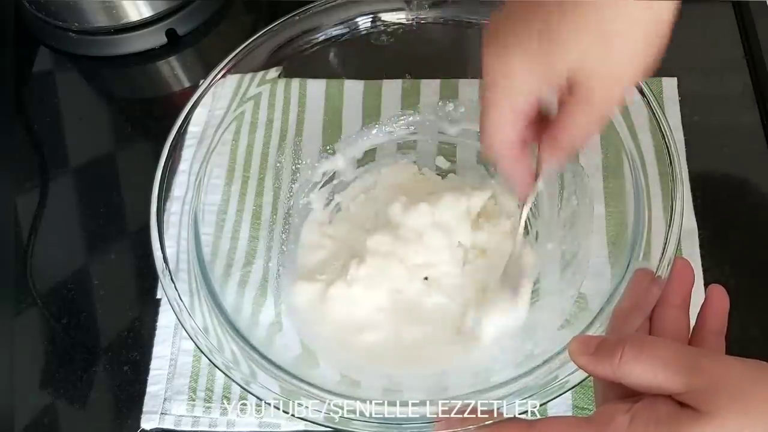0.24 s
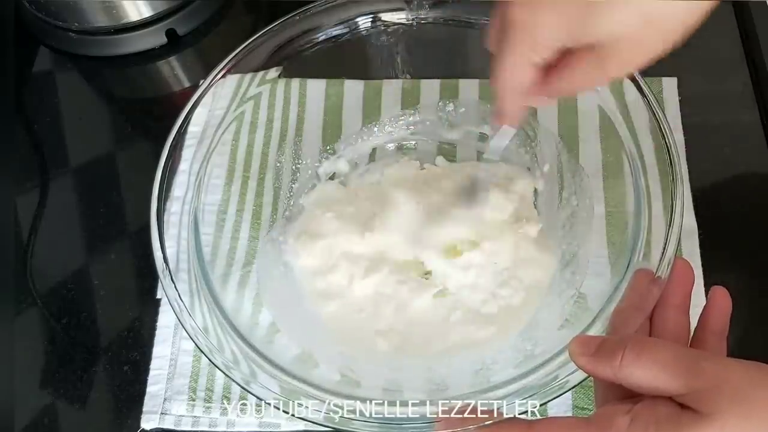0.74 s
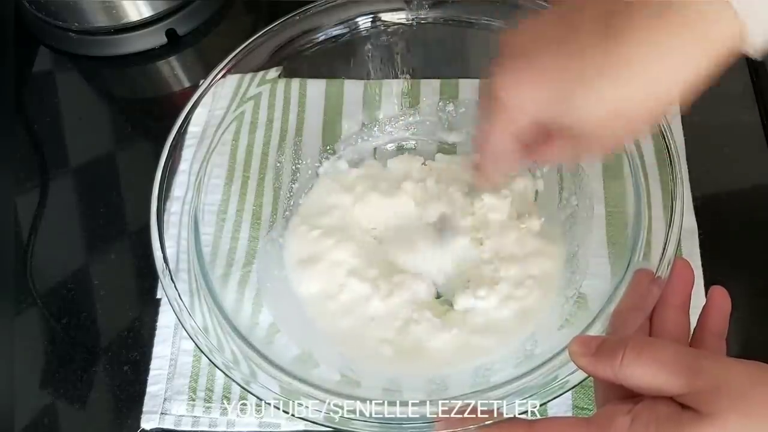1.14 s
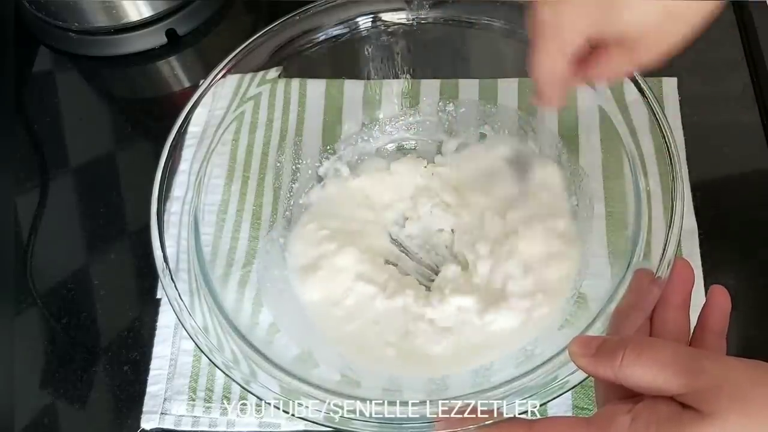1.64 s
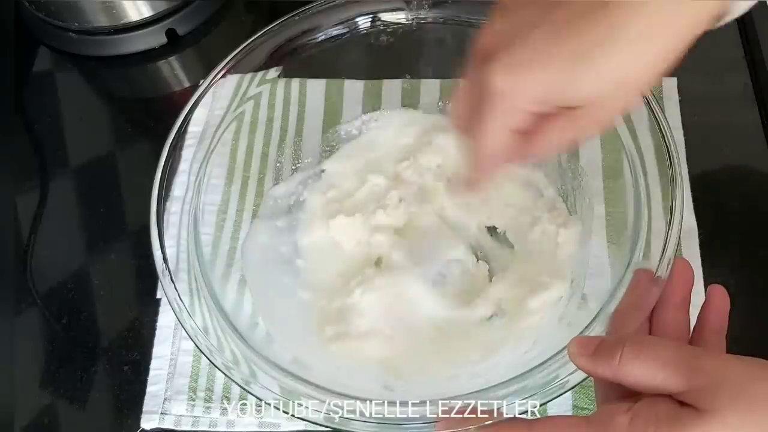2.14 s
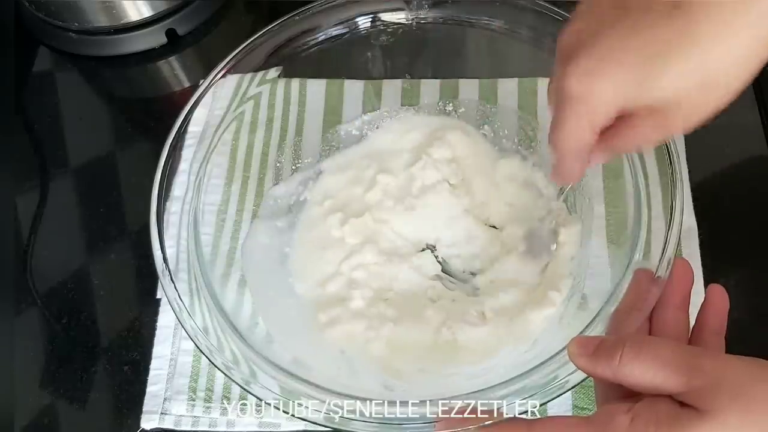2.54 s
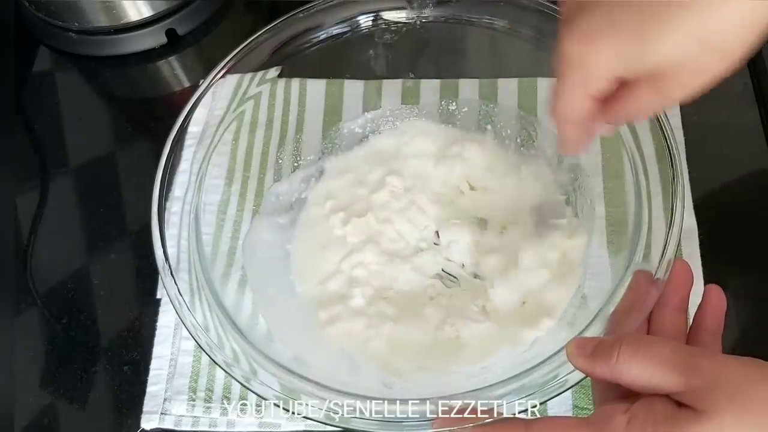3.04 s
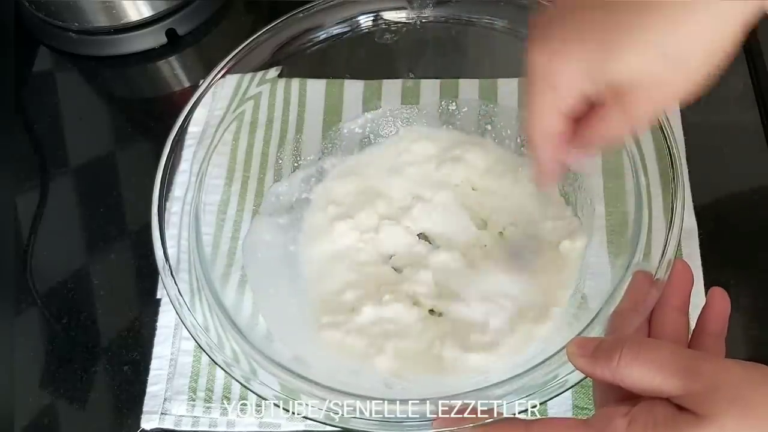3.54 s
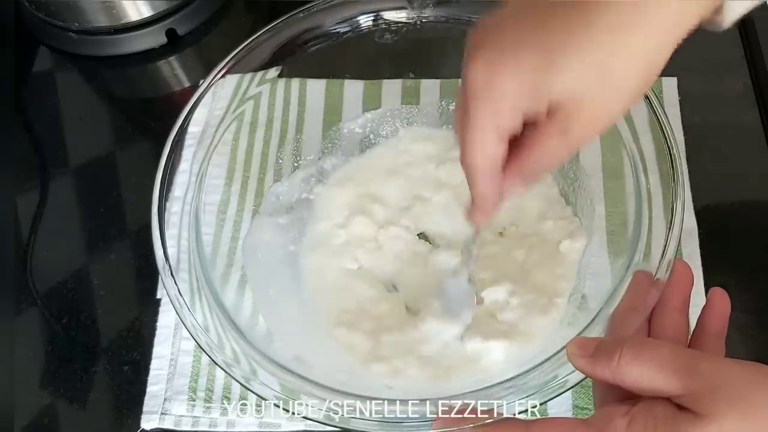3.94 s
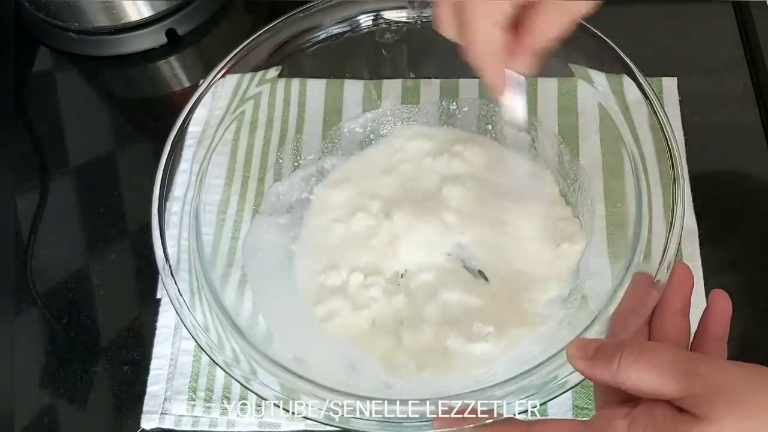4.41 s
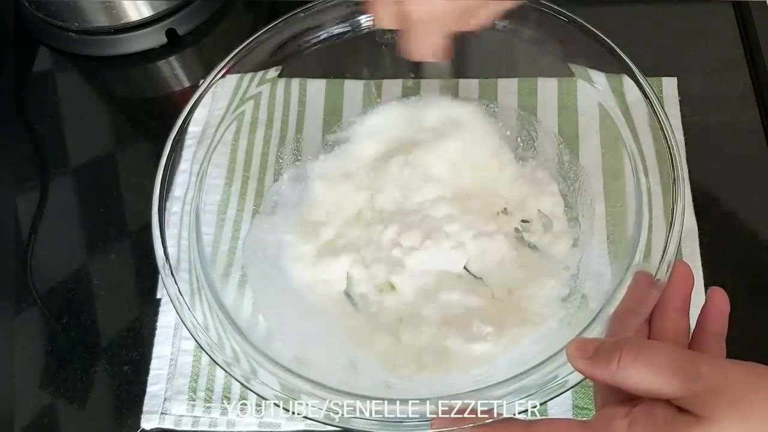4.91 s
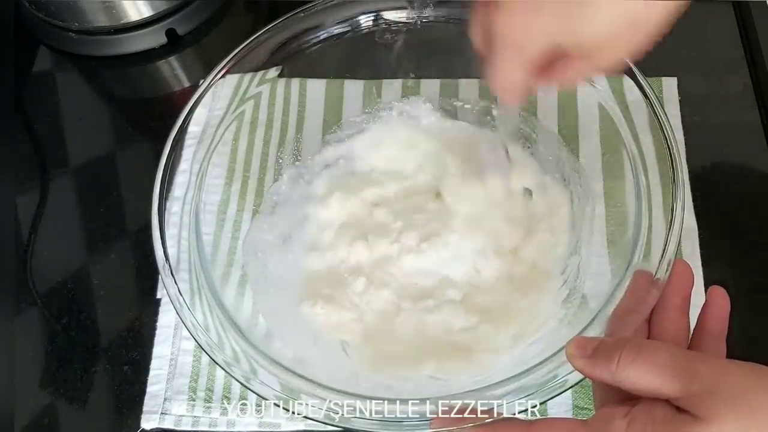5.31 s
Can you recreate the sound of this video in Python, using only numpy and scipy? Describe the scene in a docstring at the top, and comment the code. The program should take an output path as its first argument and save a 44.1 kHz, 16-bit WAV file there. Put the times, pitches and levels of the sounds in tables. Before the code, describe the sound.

Close wet squelching and crackling of creamy food stirred with a metal fork, glass clinking now and then over faint hiss.

```python
"""Wet smacks and crackle, close by, with a clink of glass: a fork mashes soft curds in a thick glass bowl
that stands on a cloth on a kitchen counter. Plunges and drags of the fork shape noise made of tearing grains;
bursting pockets are ringing puffs of noise, scrapes are resonant noise and clinks are decaying glass modes.
Under them the shoved counter hums low in noise-fed resonances. A small hard room answers by convolution;
two microphones a hand apart, with a steady hiss."""
import sys
import numpy as np
from scipy import signal
from scipy.fft import rfft, irfft
from scipy.io import wavfile

SR = 44100
rng = np.random.default_rng(int(sys.argv[2]) if len(sys.argv) > 2 else 0)


def to_wav(s):
    """Save 16-bit WAV."""
    ch = np.atleast_2d(s).T  # columns
    pcm = np.round(np.clip(ch, -1, 1) * 32767)  # PCM
    wavfile.write(sys.argv[1], SR, pcm.astype(np.int16))


N = 245360  # length [samples]
LIFT_S = 0.032  # time for a drag, scrape or glassy ring to fade by 20 dB after its peak [s]

# All source levels below are set ahead of the room and of the balance between the microphones.


def mash():
    """Tiny films tear by the hundred each second, some wide, some pitched; the squelch is lower in pitch."""
    # the fork plunges in, the crackle bites at once and settles:
    # (time [s], crackle level [dB], fade per 20 dB [s], squelch relative to crackle [dB])
    plunges = [(0.009, -64, 0.14, 13.5), (0.218, -73.5, 0.31, 11), (0.389, -62.5, 0.12, 7.5),
               (0.457, -60, 0.086, -20), (0.704, -74.5, 1, 8), (0.959, -52.5, 0.16, 6),
               (1.229, -55.5, 0.27, -1.5), (1.752, -53, 0.12, 5), (1.878, -56.5, 0.88, -3),
               (1.98, -37, 0.063, 6.5), (2.393, -45.5, 0.073, -2.5), (2.591, -55.5, 0.047, -63),
               (3.237, -56, 0.25, -3), (3.544, -62.5, 0.18, -13), (4.057, -47, 0.13, -3),
               (4.282, -60, 0.14, 25), (4.563, -50.5, 0.074, 20), (4.869, -67, 0.15, -42),
               (5.451, -50.5, 0.08, 3.5)]
    # the fork drags through, the crackle swells until the tines lift:
    # (lift time [s], crackle level [dB], swell per 20 dB [s], squelch relative to crackle [dB])
    drags = [(0.931, -64.5, 0.26, 9.5), (1.321, -61.5, 0.091, 17), (1.567, -58.5, 0.12, 1.5),
             (2.268, -46, 0.028, -23), (2.651, -54, 0.022, -6.5), (2.873, -63, 0.12, 11.5),
             (3.077, -70, 0.16, 19), (3.151, -67.5, 0.096, 6), (3.34, -52, 0.13, -34),
             (3.604, -53.5, 0.049, -26), (3.861, -61.5, 0.11, -23), (4.2, -66, 0.076, 9.5),
             (4.977, -56, 0.032, -6.5), (5.095, -61.5, 0.25, -22), (5.272, -52.5, 0.16, 7.5)]
    # spectra of the fine tearing and of the deep squelch: (frequency [Hz], relative level [dB])
    crackle_spectrum = [(1200, -107), (2300, 17), (3300, -26.5), (4500, -10), (8000, 3), (12000, 17.5),
                        (16000, 5)]
    squelch_spectrum = [(120, -16.5), (300, 12), (700, 5), (1300, -10), (2200, -131.5), (4000, -5)]
    bite_s = 0.0075  # swell of a plunge per 20 dB [s]
    rest_crackle_db, rest_squelch_db = -90, -77  # the mash settling between strokes

    strokes = [(s, db, bite_s, fade, deep) for s, db, fade, deep in plunges]
    strokes += [(s, db, swell, LIFT_S, deep) for s, db, swell, deep in drags]
    crackling = efforts(rest_crackle_db, [row[:4] for row in strokes])
    deep_strokes = [(s, db + deep, swell, fade) for s, db, swell, fade, deep in strokes]
    squelching = efforts(rest_squelch_db, deep_strokes)

    noise = rng.standard_normal((3, N))
    noise = noise[0] + noise[1:]  # partly alike at the two sides
    pitched = 0
    for hz in np.geomspace(1500, 9000, num=5):
        grains = noise * tearing(per_s=200, spread_db=9.5, grain_s=0.006)
        pitched = pitched + evened(resonate(grains, hz, width=0.5 * hz))
    wide = coloured(noise * tearing(per_s=450, spread_db=6, grain_s=0.003), crackle_spectrum)
    sharp_pops = coloured(noise * tearing(per_s=160, spread_db=6.5, grain_s=0.0008), crackle_spectrum)
    crackle = wide + 0.9 * pitched + 0.55 * sharp_pops
    squelch = coloured(noise * tearing(per_s=200, spread_db=8.2, grain_s=0.0037), squelch_spectrum)
    return crackling * crackle + squelching * squelch


def tearing(per_s, spread_db, grain_s):
    """Level of many short decaying grains, few of them large, over a thin steady fizz."""
    sizes = gain_of(spread_db * np.minimum(rng.exponential(1, N), 3))
    tears = sizes * (rng.random(N) < per_s / SR)
    decay = np.exp(-1 / (grain_s * SR))
    grains = signal.lfilter([1], [1, -decay], tears) / (grain_s * SR)
    return evened(0.25 * tears.mean() + grains)


def smacking():
    """Pockets in the mash burst wetly, one by one, as the fork works."""
    # wet smacks and ticks of the tines:
    # (time [s], pocket peak level before a small random tilt [dB], pocket pitch [Hz],
    #  peak of the treble snap relative to the pocket [dB])
    smacks = [(0.011,-35,2240,1),(0.156,-48.5,710,10.5),(0.218,-39,8750,-9),(0.385,-29,9300,5),(0.456,-38.5,2170,16.5),(0.698,-46,1940,-16),(0.716,-42.5,4100,-22),(0.793,-43,4070,8),(0.811,-41.5,1260,-10),(0.848,-35,4330,4),(0.952,-29.5,2570,5),(1.04,-44,6960,17),(1.059,-32.5,5500,5.5),(1.093,-38,3880,0),(1.108,-38.5,8950,7),(1.132,-48,2600,21),(1.23,-39,1070,5),(1.266,-30.5,4100,4),(1.304,-26.5,2680,-24),(1.314,-27,2350,1.5),(1.371,-33,2330,2.5),(1.51,-35.5,2300,-3),(1.541,-31,5400,-5),(1.577,-39.5,7050,13),(1.618,-32.5,3900,5.5),(1.651,-39,3800,9),(1.659,-37,3050,15.5),(1.735,-43.5,1120,8.5),(1.752,-31,1540,12),(1.857,-37.5,7700,7),(1.868,-32.5,2830,9.5),(1.98,-20.5,1620,-9),(2.004,-22.5,1060,-17),(2.207,-25.5,2720,8.5),(2.27,-29,997,2),(2.398,-26,4600,0),(2.403,-22,2260,-19),(2.453,-24,4400,-5),(2.587,-35,7000,11.5),(2.633,-32,2670,-6),(2.663,-37,9000,14.5),(2.855,-25.5,8540,-3),(2.873,-26.5,8400,2),(3.062,-40.5,5540,4),(3.131,-32.5,7300,9),(3.237,-35,2700,-16),(3.273,-37,1180,13.5),(3.54,-35.5,7960,16),(3.798,-39,4300,10.5),(3.833,-34,2740,6.5),(4.051,-30,1870,-17),(4.064,-16,8450,5),(4.2,-33.5,8860,7.5),(4.284,-14,7000,-4),(4.427,-37,7860,12),(4.556,-10.5,7200,-16),(4.72,-43,2500,16),(4.863,-30.5,5740,-4),(4.94,-37.5,7340,2),(5.012,-38,2270,-3),(5.098,-35.5,1460,-13),(5.112,-32.5,2030,4.5),(5.216,-41,3870,-17),(5.24,-36.5,2230,-15),(5.254,-29,1140,-19),(5.446,-29.5,8600,10),(5.476,-26,680,-8)]
    food = np.zeros((2, N))
    for s, *row in smacks:
        add(food, s, smack(*row))
    return food


def smack(db, hz, snap_db):
    """A pocket in the mash bursts: a puff of noise rings its pitch and a shorter snap of treble tops it."""
    t = np.arange(3000) / SR
    noise = rng.standard_normal((4, 3000)) * (1 - np.exp(-t / 0.0001))
    puff = noise[0] * np.exp(-t / (0.003 + 1.8 / hz))  # deep pockets empty slower
    pocket = resonate(puff, hz, width=0.22 * hz)
    hiss_burst = (noise[1] + noise[2:]) * np.exp(-t / 0.002)  # partly alike at the two sides
    snap = signal.lfilter(*signal.butter(2, 5000, "high", fs=SR), hiss_burst)
    both = pocket / abs(pocket).max() + gain_of(snap_db) * snap / abs(snap).max()
    tilt_db = rng.normal(0, 1.2) * np.array([[1], [-1]])  # left against right
    return gain_of(db + tilt_db) * both


def scraping():
    """Grainy noise rings one narrow pitch per scrape or glassy ring, with a high sizzle on top."""
    # resonant scrapes, and two short glassy rings near 2 kHz at 0.022 and 0.462 s:
    # (peak time [s], level of the pitched part [dB], swell per 20 dB [s], pitch [Hz])
    scrapes = [(0.022, -52.5, 0.0059, 2200), (0.462, -46.5, 0.0062, 2000), (1.325, -69, 0.059, 2440),
               (3.606, -48, 0.051, 2760), (3.855, -51, 0.06, 2700), (5.03, -48.5, 0.089, 2180),
               (5.13, -44, 0.053, 1700)]
    pitch_width = 0.18  # share of the pitch
    sizzle_hz, sizzle_width_hz, sizzle_db = 11500, 1500, -4  # level relative to the pitched part

    noise = rng.standard_normal((3, N))
    grains = (noise[0] + noise[1:]) * tearing(per_s=450, spread_db=2.5, grain_s=0.0033)
    sizzle = gain_of(sizzle_db) * evened(resonate(grains, sizzle_hz, sizzle_width_hz))
    out = np.zeros((2, N))
    for s, db, swell, hz in scrapes:
        pitched = evened(resonate(grains, hz, pitch_width * hz))
        out += efforts(-np.inf, [(s, db, swell, LIFT_S)]) * (pitched + sizzle)
    return out


def clinking():
    """The fork strikes the glass; where it lands sets which modes answer."""
    # (time [s], rim level [dB], wall level [dB], tine level [dB], thump level [dB],
    #  free ring before the mash muffles it [s])
    clinks = [(0.016, -45, -64, -74, -60, .08), (0.456, -60, -72, -56, -34, .1),
              (1.995, -41, -70, -60, -27, .05), (2.103, -60, -31, -56, -50, .085),
              (2.883, -80, -54, -80, -46, .03), (3.024, -43, -66, -62, -44, .035),
              (4.065, -38, -54, -37, -36, .22), (4.284, -29, -35, -22, -30, .15),
              (4.556, -27, -46, -26, -28, .15), (5.478, -60, -56, -60, -48, .08)]
    glass = np.zeros((2, N))
    for s, *row in clinks:
        add(glass, s, clink(*row))
    return glass


def clink(*row):
    """Each mode blooms over some cycles and dies, fast once the mash presses; chattering tines blur the rings."""
    # modes in four families, rim, wall, tine and thump:
    # (frequency [Hz], level relative to the family [dB], t60 while free [s])
    bowl_modes = [
        [(511, 4, 0.5), (526, 1, 0.25)],
        [(1335, 14, 0.05), (1349, -2, 0.33), (1435, -8, 0.3)],
        [(3850, -13, 0.35), (4150, -12, .22), (6630, -8, .2), (6900, -8, .18), (7075, -3, .24), (7400, -9, .2),
         (12500, -9, .14)],
        [(280, -9, 0.15), (365, -6, 0.2), (620, -8, 0.05)],
    ]
    # how each family reaches the left side against the right: (level [dB], phase lead [rad])
    left_side = [(-5, -1.7), (-4, 1.6), (-1, 1.4), (-11, 0)]
    muffle_db_per_s = 500  # extra decay once the mash presses on the glass

    *family_db, free_s = row
    t = np.arange(20000) / SR
    out = np.zeros((2, len(t)))
    for db, family, (left_db, lead) in zip(family_db, bowl_modes, left_side):
        side_gain = gain_of([[left_db], [0]])
        for hz, mode_db, t60 in family:
            bloom = 1 - np.exp(-t * hz / 3.5)
            ring = gain_of(db + mode_db - 60 * t / t60) * bloom
            tone = np.sin(2 * np.pi * hz * t + [[lead], [0]])
            blur = evened(resonate(rng.standard_normal((2, len(t))), hz, width=0.06 * hz))
            blur_share = np.clip(hz / 14000, 0.22, 0.6)  # high modes blur more
            out += ring * side_gain * (tone + blur_share * blur)
    return out * gain_of(-muffle_db_per_s * np.maximum(t - free_s, 0))


def counter():
    """Rubbing through the cloth shakes the slab's low resonances as the bowl is shoved."""
    # the bowl is shoved against the counter: (time [s], hum level [dB], fade per 20 dB [s])
    shoves = [(.0, -61.5, 0.19), (.45, -56, 0.12), (1.32, -53, 0.16), (1.88, -45, 0.3), (2.28, -54, .2),
              (2.815, -45, 0.22), (2.925, -44, .14), (3.045, -44, 0.14), (4.08, -50.5, 0.082),
              (4.31, -53, 0.12), (4.57, -57, 0.12), (5.47, -50, 0.12)]
    # resonances of the slab, each passed twice: (frequency [Hz], width of one pass [Hz], relative level [dB])
    slab = [(52.5, 16, 1), (100.5, 37, 10.5), (329, 120, -9)]
    shove_swell, rest_hum_db = 0.22, -74.5  # swell as a share of the fade; hum of the bowl at rest

    rub = rng.standard_normal(N)
    hum = np.zeros(N)
    for hz, width, db in slab:
        once = resonate(rub, hz, width)
        hum += gain_of(db) * evened(resonate(once, hz, width))
    shoving = efforts(rest_hum_db, [(s, db, shove_swell * fade, fade) for s, db, fade in shoves])
    return shoving * gain_of([[-0.6], [0.6]]) * evened(hum)


def kitchen(x, tail_db, bounce):
    """Each microphone hears its own bounces off bowl wall and counter, then a tail that dies band by band."""
    # decay of the small hard room: (frequency [Hz], t60 [s])
    room_decay = [(200, 0.35), (1400, 0.29), (4000, 0.24), (14000, 0.07)]
    taps = np.zeros((2, SR // 2))
    # one echo of random sign at a random place in every 20 samples
    at = np.arange(200, SR // 2 - 20, 20) + rng.integers(0, 20, (2, (SR // 2 - 201) // 20))
    np.put_along_axis(taps, at, rng.choice([-1., 1.], at.shape), 1)
    hz, t, z = signal.stft(taps, SR, nperseg=256)
    decay = gain_of(-60 * t / read(room_decay, hz)[:, None])
    tail = signal.istft(z * decay, SR, nperseg=256)[1]
    paths = gain_of(tail_db) * tail / np.linalg.norm(tail[0])
    paths[[0, 1], [1, 2]] = 0.7  # the direct sound reaches the left side first
    bounces = bounce * np.array([-.25, .2, .2, .25, -.25, -.2])
    paths[[0, 0, 0, 1, 1, 1], [17, 55, 131, 29, 73, 109]] += bounces
    return signal.fftconvolve(x, paths, axes=1)[:, :N]


def hiss():
    """Steady noise of room and microphones, apart in each channel."""
    # spectrum of the noise floor: (frequency [Hz], relative level [dB])
    floor_spectrum = [(18, -26), (30, 6.5), (533, 4), (694, -5.5), (1200, -2), (1700, -15), (3130, -30),
                      (14800, -4)]
    floor_db = -69.5  # rms level
    return gain_of(floor_db) * coloured(rng.standard_normal((2, N)), floor_spectrum)


def efforts(rest_db, rows):
    """Gain of gestures (time [s], level [dB], swell [s], fade [s]) that add in power over a resting level."""
    step_db = 20  # every swell and fade time is the time for this change
    t = np.arange(N) / SR
    power = gain_of(rest_db) ** 2
    for s, db, swell_s, fade_s in rows:
        before = (s - t) / max(swell_s, 0.002)
        after = (t - s) / max(fade_s, 0.002)
        power = power + gain_of(db - step_db * np.maximum(before, after)) ** 2
    return np.sqrt(power)


def resonate(x, hz, width):
    """A two-pole resonance with gain 1 at hz."""
    return signal.lfilter(*signal.iirpeak(min(hz, SR * .45), max(hz / width, .3), SR), x)


def coloured(x, points):
    """Filters x by the spectrum in points and brings it to rms 1."""
    gain = gain_of(read(points, np.fft.rfftfreq(N, 1 / SR)))
    return evened(irfft(rfft(x) * gain, N))


def read(points, hz):
    """Value of a table at hz, interpolated along log frequency."""
    f, value = np.transpose(points)
    return np.interp(np.log(hz + 1), np.log(f + 1), value)


def evened(x):
    """Brings x to rms 1 over all its channels together."""
    return x / np.sqrt(np.mean(x ** 2) + 1e-20)


def gain_of(db):
    """Amplitude factor of a level in dB."""
    return 10 ** (np.asarray(db) / 20)


def add(mix, s, sound):
    """Lays a sound into the mix from s seconds on, cut at the end."""
    part = mix[:, round(s * SR):][:, :sound.shape[1]]
    part += sound[:, :part.shape[1]]


def scene():
    """Food and glass heard through the room, with the counter's hum and the hiss beneath."""
    food = (mash() + scraping() + smacking()) * gain_of([[-1.3], [1.3]])  # a little louder on the right
    bowl = kitchen(food, tail_db=-13, bounce=0.33)
    # the clinks are kept drier, with a weaker tail and no early bounces
    bowl += kitchen(clinking(), tail_db=-23, bounce=0)
    return bowl + counter() + hiss()


def record(dry):
    """A steep low-pass at the top of the band."""
    edge_hz = 15700
    low_pass = signal.firwin(255, edge_hz, window=("kaiser", 9), fs=SR)
    return signal.oaconvolve(dry, low_pass[None], "same")


dry = scene()
out = record(dry)
to_wav(out)
```